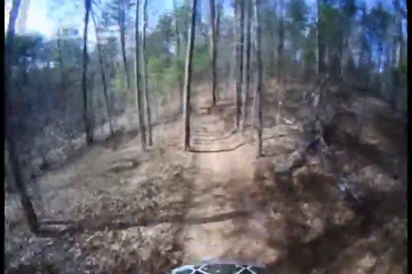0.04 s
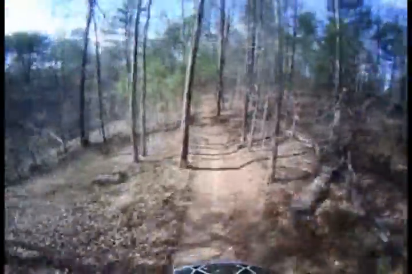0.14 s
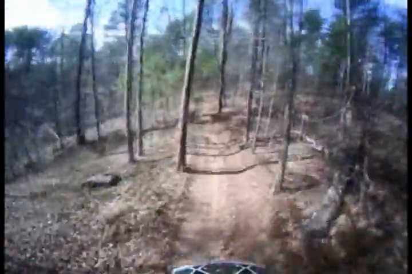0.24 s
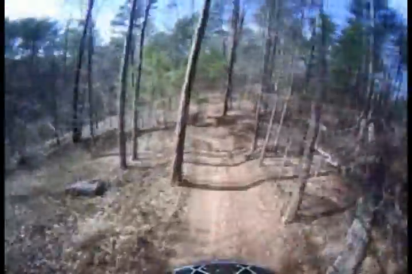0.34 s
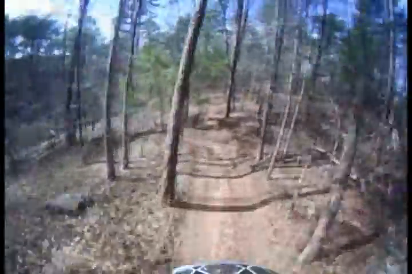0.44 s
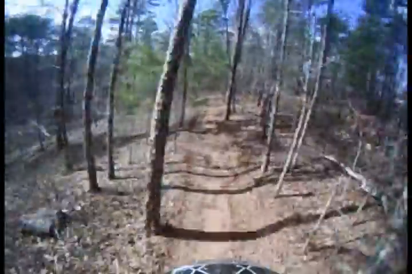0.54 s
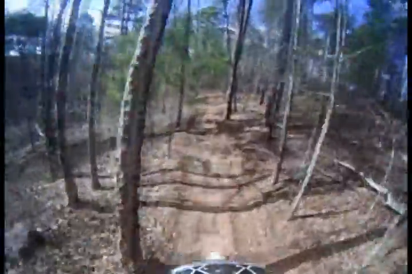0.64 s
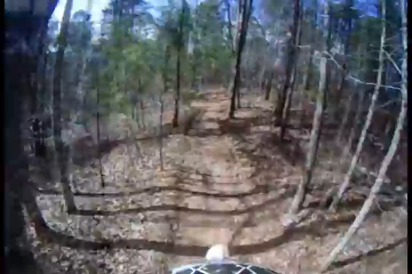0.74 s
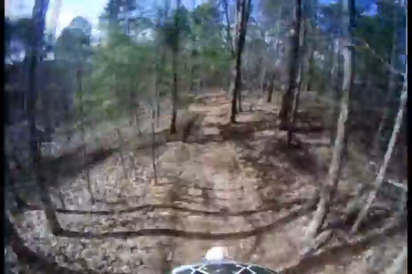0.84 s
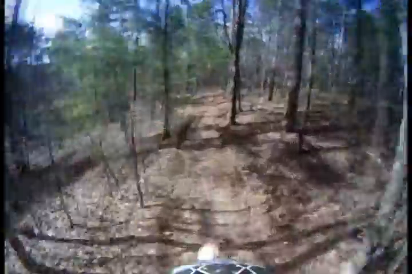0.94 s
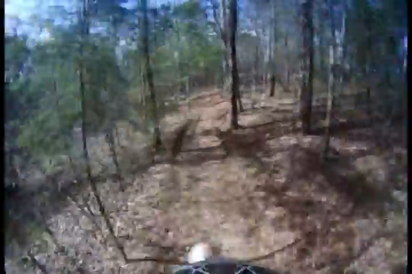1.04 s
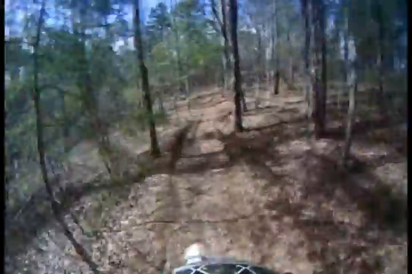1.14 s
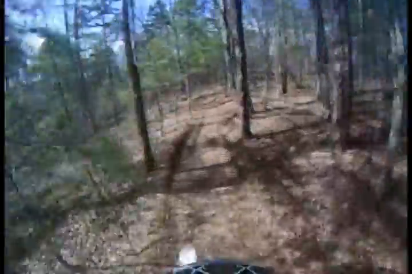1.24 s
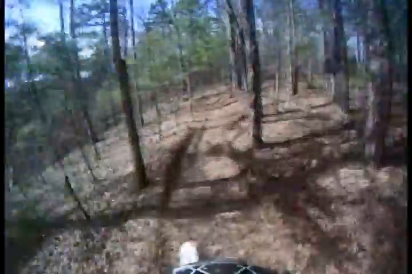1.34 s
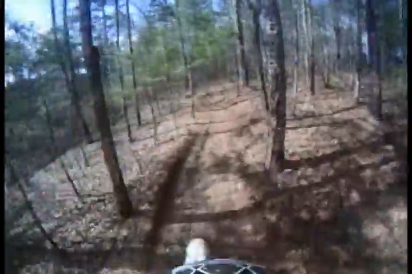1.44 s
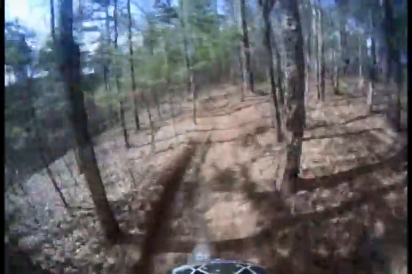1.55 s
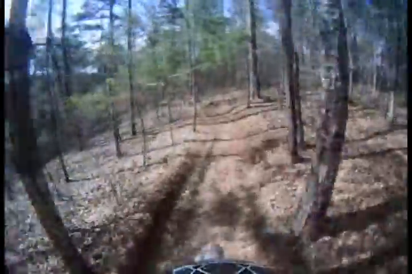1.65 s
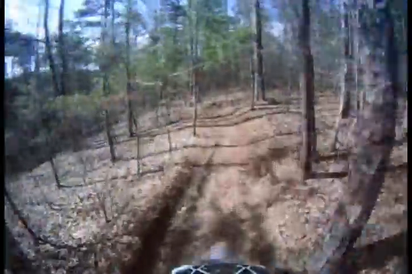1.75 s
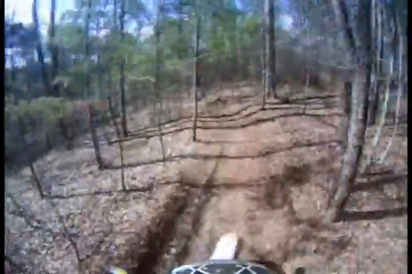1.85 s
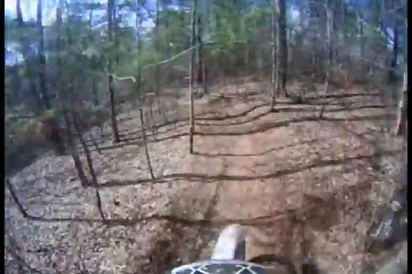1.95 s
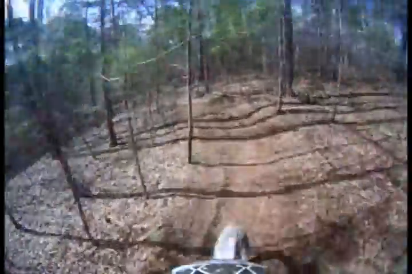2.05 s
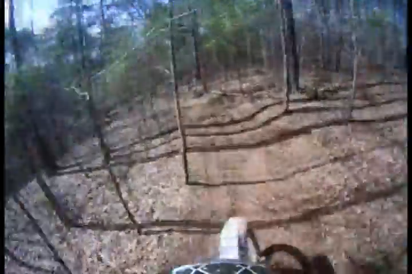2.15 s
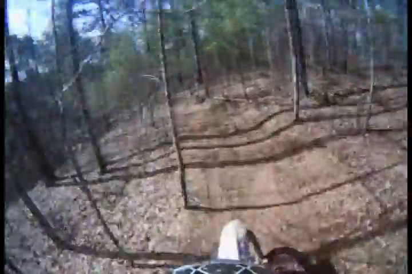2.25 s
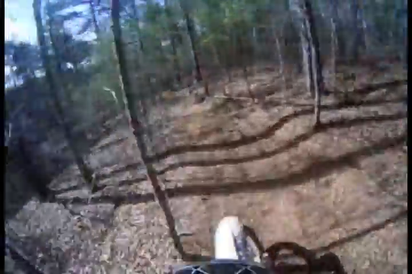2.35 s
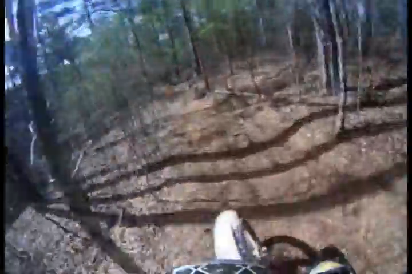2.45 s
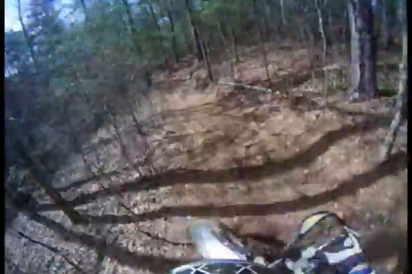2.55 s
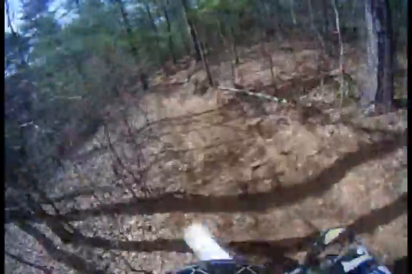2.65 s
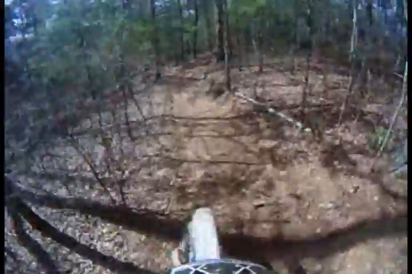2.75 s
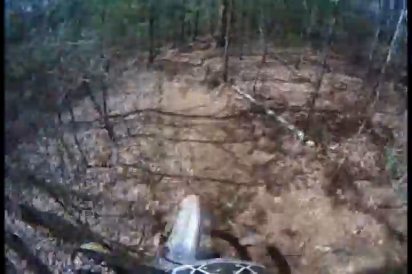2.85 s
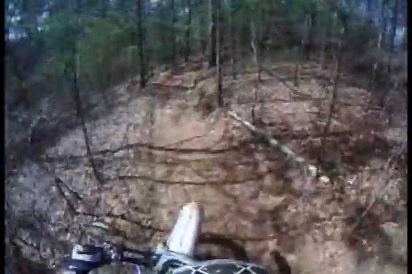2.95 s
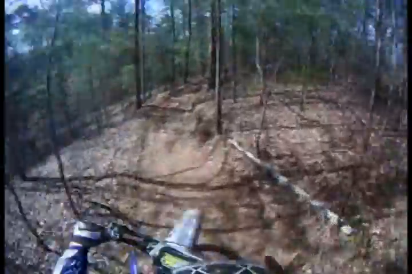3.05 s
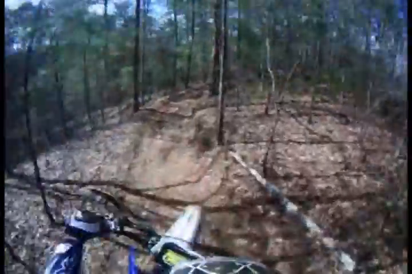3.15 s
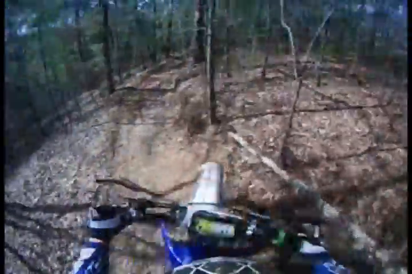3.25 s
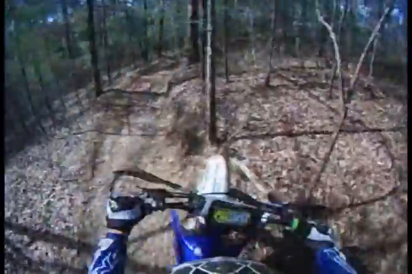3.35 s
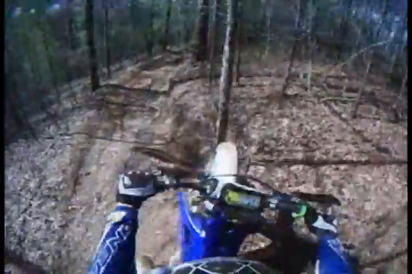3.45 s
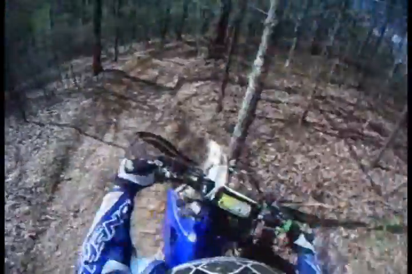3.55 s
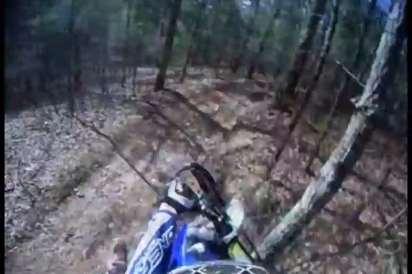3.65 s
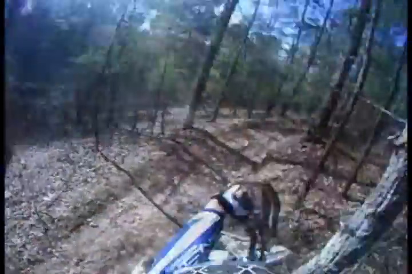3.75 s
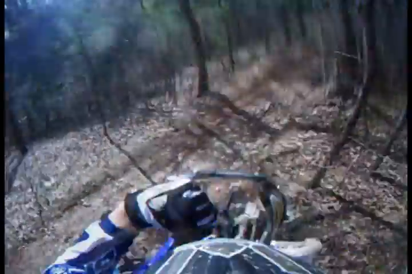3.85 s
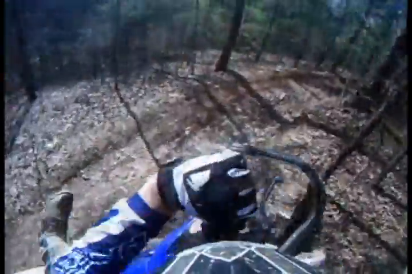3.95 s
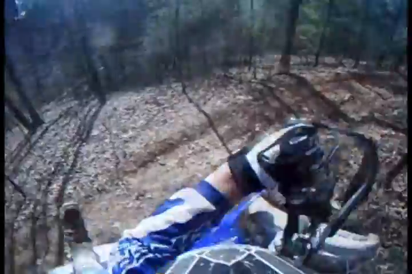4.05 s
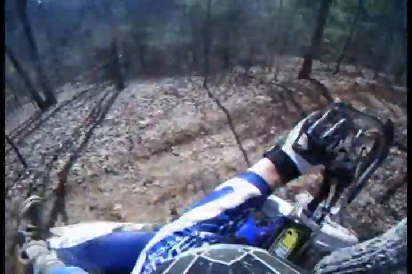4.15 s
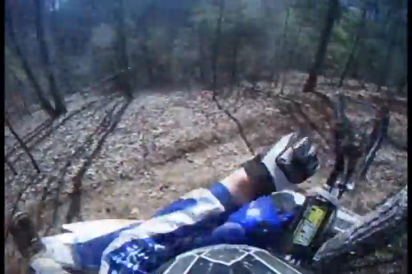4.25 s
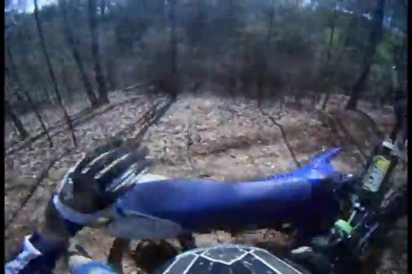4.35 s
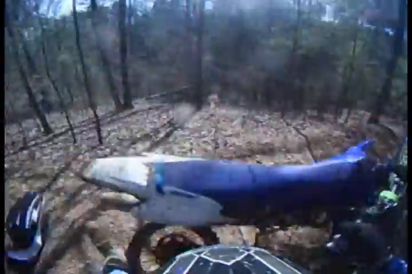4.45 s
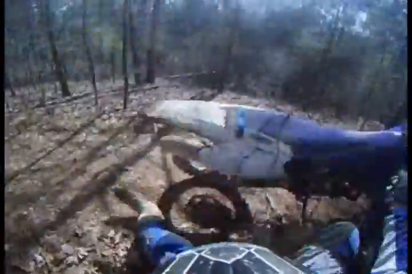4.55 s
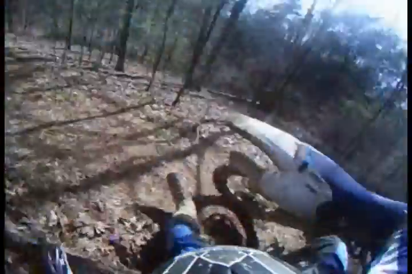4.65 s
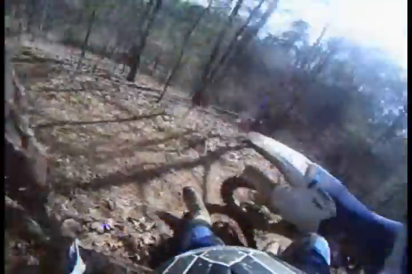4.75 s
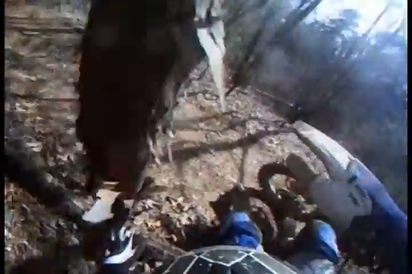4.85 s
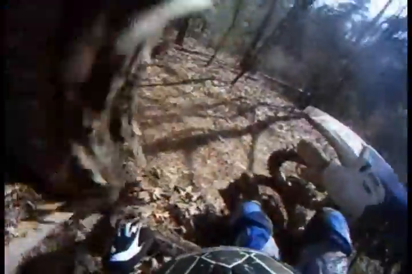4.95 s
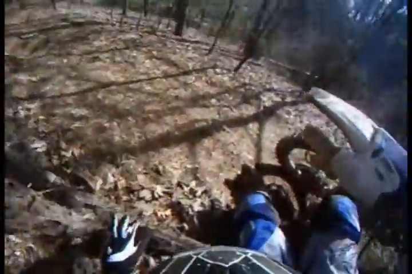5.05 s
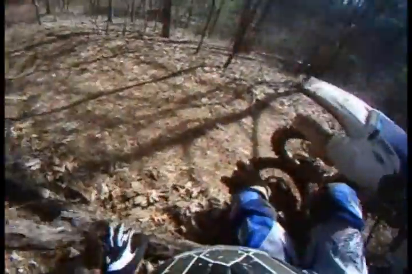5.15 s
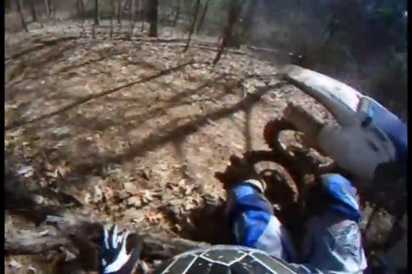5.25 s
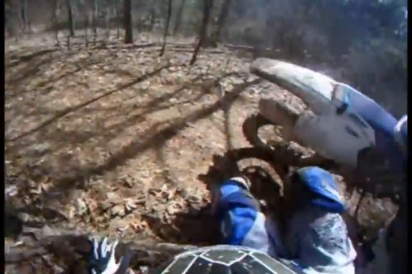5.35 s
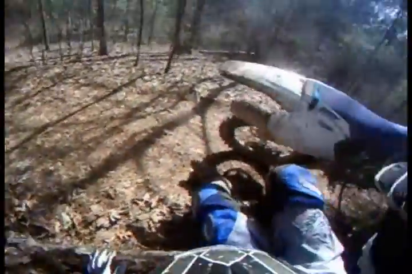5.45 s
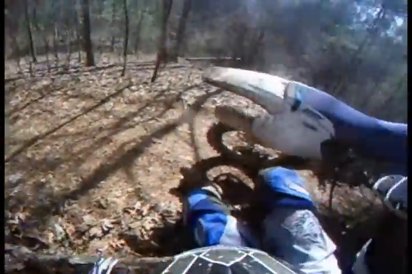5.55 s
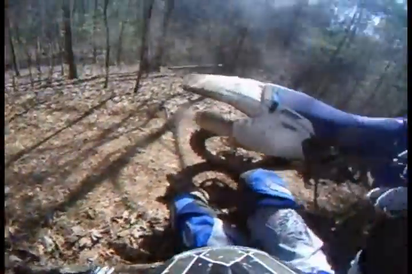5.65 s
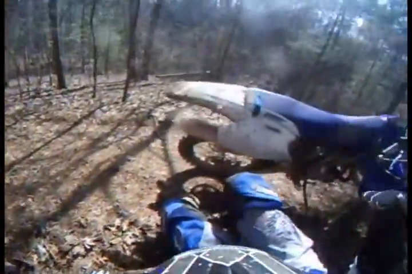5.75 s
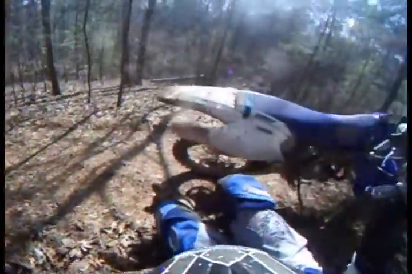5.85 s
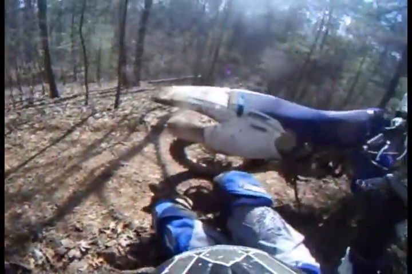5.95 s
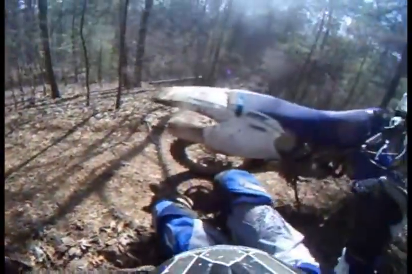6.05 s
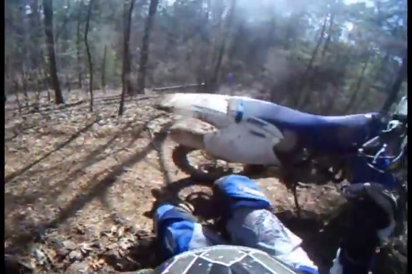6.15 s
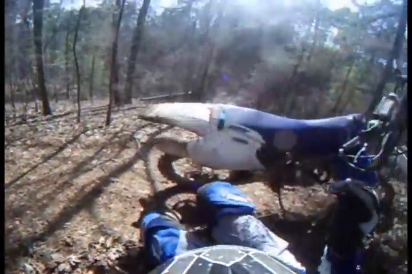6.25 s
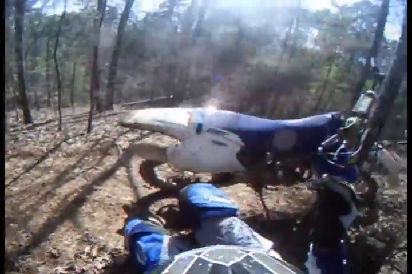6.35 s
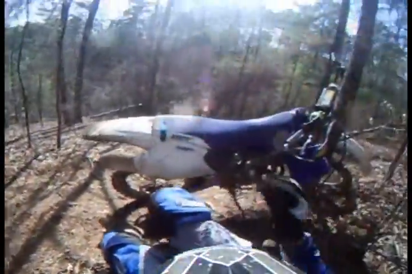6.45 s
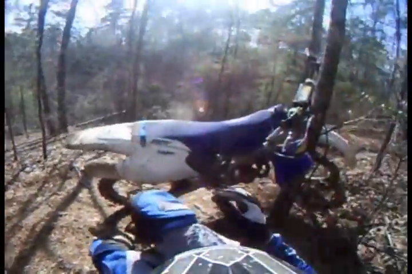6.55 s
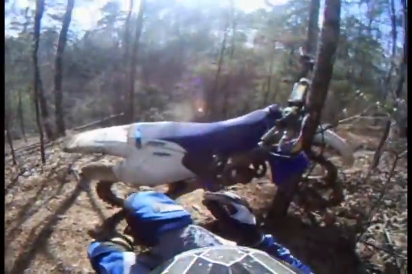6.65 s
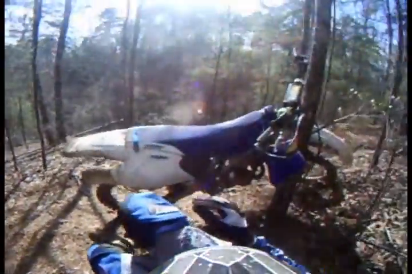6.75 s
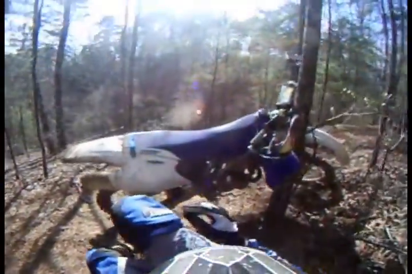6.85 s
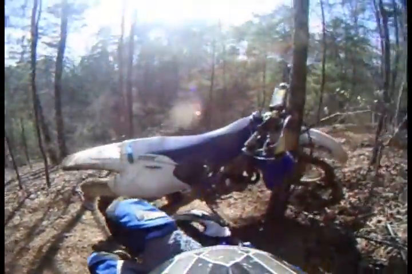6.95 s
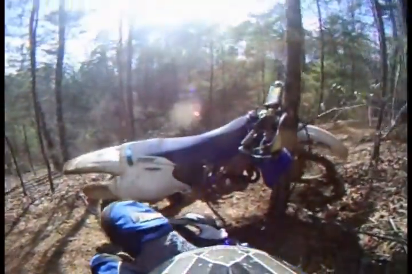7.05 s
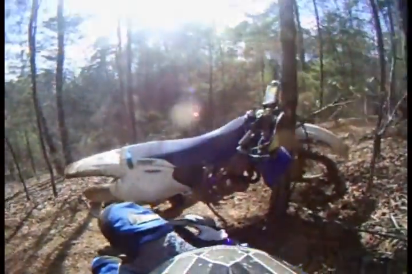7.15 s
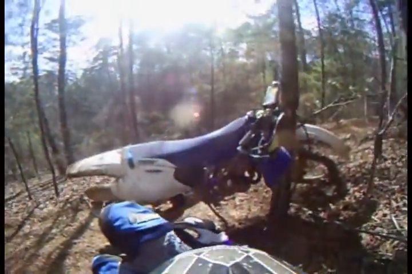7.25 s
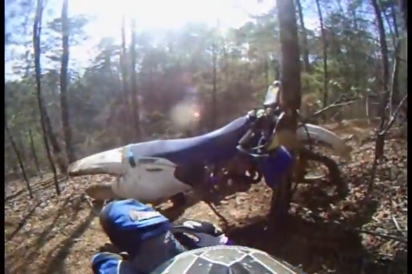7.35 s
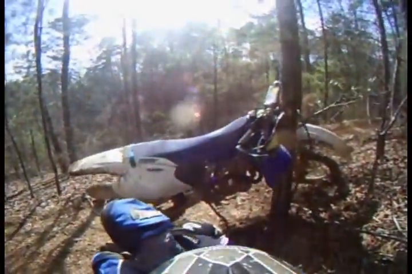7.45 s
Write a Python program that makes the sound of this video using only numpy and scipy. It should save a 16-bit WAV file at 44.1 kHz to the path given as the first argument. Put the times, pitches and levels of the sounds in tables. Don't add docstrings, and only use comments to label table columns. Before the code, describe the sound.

A single-cylinder four-stroke bike revs, coasts with sputtering strokes and revs again outdoors in woods, heard through a dull helmet camera casing. After a last loud burst it hits a tree: clipped, crackling blows, rattles, scrapes and dull thuds come in clusters. Then only a slow, quiet idle thump, low rumble and a few small ticks remain.

```python
import sys
import numpy as np
from scipy import signal
from scipy.fft import rfft, irfft
from scipy.io import wavfile
from scipy.ndimage import uniform_filter1d

SR = 44100
rng = np.random.default_rng(int(sys.argv[2]) if len(sys.argv) > 2 else 0)


def inscribe(sig):
    pcm = np.round(np.clip(np.atleast_2d(sig).T, -1, 1) * 32767)
    wavfile.write(sys.argv[1], SR, pcm.astype(np.int16))


def decibels_to_gain(level_db):
    exponent = np.asarray(level_db, float) / 20
    return 10 ** exponent


N = 331178
RAIL = 1.15
COUPLING_S = .0019
SHUT_DB, OPEN_DB = -37, -30


def in_time(rows):
    s, *columns = np.transpose(rows)
    return [np.interp(np.arange(N) / SR, s, c) for c in columns]


def rms_one(x):
    return x / np.sqrt(np.mean(x ** 2) + 1e-20)


def drift(rate_hz):
    r = np.exp(-2 * np.pi * rate_hz / SR)
    return rms_one(signal.lfilter([1], [1, -2 * r, r * r], rng.standard_normal(N + SR))[SR:])


def resonate(x, modes):
    out = 0
    for k, (hz, width_hz, db) in enumerate(modes):
        r = np.exp(-np.pi * width_hz / SR)
        a = [1, -2 * r * np.cos(2 * np.pi * hz / SR), r * r]
        mode = signal.lfilter([(1 - r * r) / 2, 0, (r * r - 1) / 2], a, x + 1e-18)
        out = out + (-1) ** k * decibels_to_gain(db) * mode
    return out


def low_pass(x, hz, order=2):
    return signal.sosfilt(signal.butter(order, hz, fs=SR, output="sos"), x)


def strokes(turns, jitter, spread_db):
    whole = np.floor(turns + jitter * drift(57))
    at = np.flatnonzero(np.diff(np.maximum.accumulate(whole)) > 0)
    clicks = np.zeros(N)
    clicks[at] = decibels_to_gain(spread_db * rng.standard_normal(N)[:len(at)])
    return clicks


# (t/s, f/Hz)
CRANK_SPEED = [(0, 90), (.26, 85), (.44, 106), (.5, 97.5), (.715, 99.5), (.745, 78), (.78, 93), (.92, 86),
               (1.04, 91.5), (1.3, 91.5), (1.6, 84.5), (1.87, 85), (2.17, 76.5), (2.5, 75), (2.7, 72),
               (2.79, 62), (2.86, 80), (3.0, 97),
               (3.13, 104.5), (3.26, 82), (3.3, 69.5), (3.5, 35), (3.61, 32), (3.62, 74), (3.73, 74),
                 (3.8, 50), (5.4, 30)]
# (t/s, level/dB)
THROTTLE_BARK = [(0, -34), (.275, -38), (.285, -28.5), (.72, -26.5), (.74, -34.5), (2.44, -40.5),
                 (2.45, -35.5), (2.71, -28), (2.72, -35.5), (2.835, -40), (2.84, -18), (3.12, -20.5),
                 (3.22, -32.5), (3.605, -38), (3.612, -34.5), (3.72, -24), (3.76, -31), (5.4, -76.5)]
# (t/s, bark level/dB)
CAUGHT_STROKES = [(.08, -33), (0.784, -31.5), (1.229, -33.5), (1.588, -39.5), (1.706, -35.5),
                  (1.754, -31.5), (1.894, -34), (1.942, -34), (1.969, -33), (2.04, -34.5), (2.114, -35.5),
                  (2.273, -35), (2.299, -34), (2.327, -34), (2.404, -31.5), (2.819, -31.5), (3.504, -37.5),
                  (3.563, -37)]


def engine():
    t = np.arange(N) / SR
    crank_hz, = in_time(CRANK_SPEED)
    throttle_db, = in_time(THROTTLE_BARK)
    turns = 1 + np.cumsum(crank_hz) / SR
    bark_db = throttle_db
    for s, db in CAUGHT_STROKES:
        bark_db = np.where(np.abs(t - s) < .012, db, bark_db)
    bark_db = uniform_filter1d(bark_db, size=100)
    bark = exhaust_bark(turns, crank_hz, bark_db)
    fallen_db = -291 * (t - 3.27).clip(0, .2)
    wander = .15 * drift(8)
    tones = crank_hum(turns, wander, fallen_db)
    tones = tones + airbox_boom(turns, wander, crank_hz, throttle_db, fallen_db)
    return decibels_to_gain(bark_db) * bark + np.sqrt(2) * tones + gear_hiss(turns, throttle_db)


# (f/Hz, width/Hz, level/dB)
EXHAUST_MODES = [(235, 154, 21.5), (408.2, 450, 10.5), (610, 180, -7), (760, 36, 5), (940, 150, -3),
                 (1470, 200, 5), (1970, 250, -33.5), (2270, 350, -5.5), (2820, 310, -24.5)]


def exhaust_bark(turns, crank_hz, bark_db):
    fired = strokes(turns / 2, jitter=.002, spread_db=.8)
    fired = fired + .9 * np.roll(fired, round(.0036 * SR))
    blast = signal.lfilter([1], [1, -np.exp(-1 / (.004 * SR))], fired)
    blast = np.diff(blast * rng.standard_normal(N), prepend=0)
    bark = rms_one(resonate(fired + .09 * blast, EXHAUST_MODES))
    bark = signal.sosfilt(signal.butter(2, 150, "high", fs=SR, output="sos"), bark)
    header = resonate(fired, [(546.5, 110, 0)])
    header = rms_one(resonate(header, [(546.5, 220, 0)]))
    bark = bark + decibels_to_gain(-8 + .5 * (86 - crank_hz.clip(70))) * header
    bark /= np.sqrt(uniform_filter1d(bark ** 2, size=6000) + .01)
    flow = resonate(rng.standard_normal(N), EXHAUST_MODES[:3])
    flow = rms_one(resonate(flow, EXHAUST_MODES[:3]))
    loose = np.interp(bark_db, [SHUT_DB, OPEN_DB], [.62, .06])
    return np.sqrt(1 - loose) * bark + np.sqrt(loose) * flow


def crank_hum(turns, wander, fallen_db):
    hum = np.sin(2 * np.pi * turns + wander) + 0.22 * np.sin(3 * np.pi * turns + wander)
    return decibels_to_gain(-34.5 + fallen_db + drift(10)) * hum


def airbox_boom(turns, wander, crank_hz, throttle_db, fallen_db):
    t = np.arange(N) / SR
    orders = np.arange(3, 7)[:, None]
    airbox_hz, width_hz = 182.5, 15.1
    share = 1 / (1 + ((orders * crank_hz / 2 - airbox_hz) / width_hz) ** 2)
    boom = np.sum(share * np.sin(orders * (np.pi * turns + wander)), axis=0)
    gulp_db = sum(7 * np.exp(-((t - s) / .04 - 1) ** 2) for s in (0.778, 3.2))
    boom_db = -26.5 + gulp_db + fallen_db
    boom_db += 0.48 * (crank_hz - 90)
    boom_db -= .5 * (throttle_db - SHUT_DB).clip(0)
    return decibels_to_gain(boom_db + 1.2 * drift(25)) * boom


# (f/Hz, width/Hz, level/dB)
SHELL_MODES = [(500, 334, -1.5), (975, 1100, -6), (1479, 110, 1.5), (1917, 110, -9.5), (2430, 210, -1),
               (3102, 337, -7.5), (4986, 420, -9), (5770, 300, -8.5)]


def gear_hiss(turns, throttle_db):
    hiss_db = -39 + 0.46 * (throttle_db - SHUT_DB)
    beat = 1 + 0.13 * np.cos(np.pi * turns)
    hiss = rms_one(resonate(rng.standard_normal(N), SHELL_MODES))
    return decibels_to_gain(hiss_db + 1.1 * drift(37)) * beat * hiss


SLOW_MS = 5
WOBBLE_HZ, WOBBLE_S, WOBBLE_HEIGHT = 33.5, .085, .55


def blows():
    thrown = swings()
    knots = [(0, 0), (thrown[0][0] - .03, 0)]   # (s, travel in rails)
    rocking = np.zeros(N)
    following = [s for s, ms, force in thrown[1:]] + [N / SR]
    t = np.arange(SR // 4) / SR
    wobble = np.sin(2 * np.pi * WOBBLE_HZ * t) * np.exp(-t / WOBBLE_S)
    for (s, ms, force), after in zip(thrown, following):
        side, end = np.sign(force), s + ms / 1000
        from_rest = knots[-1][1] == 0 and ms >= SLOW_MS
        knots += [(s, -force if from_rest else -side), (end, side)]
        if after - end > .06:
            knots += [(end + .004, force), (end + .009, side), (end + .02, 0), (after - .03, 0)]
            rest = round((end + .012) * SR)
            rocking[rest:rest + len(t)] -= side * wobble
        else:
            knots += [((end + after) / 2, force)]
    return RAIL * (in_time(knots)[0] + WOBBLE_HEIGHT * rocking)


# (t/s, crossing/ms)
TREE_SWINGS = [(3.289, 2.4), (3.3006, 3.5), (3.3048, 3.1), (3.3169, 3.5), (3.3346, 3.9), (3.3416, 3),
               (3.36, 2.2), (3.3838, 2.4), (3.3922, 4.1), (3.4021, 3.5), (3.4185, 14), (3.4372, 3.5),
               (3.4532, 3.5)]
THROWN_SWINGS = [(3.7323, 6.1), (3.75, 3.9), (3.7638, 3.9), (3.7775, 4.8), (3.7903, 1.8), (3.8058, 2.4),
                 (3.8178, 5.7), (3.8305, 5), (3.8592, 3.9), (3.8688, 3.8), (3.8846, 3.5), (3.933, 2.2)]
TRUNK_SWINGS = [(3.966, 1), (3.976, 1.3), (3.9785, 3), (3.9815, 5), (3.9907, 5.7), (4.0047, 4.9),
                (4.0124, .5), (4.0166, .5), (4.0227, .7), (4.0247, .3), (4.0282, .3), (4.0296, .3),
                (4.0356, .3), (4.0584, .5), (4.0828, .5), (4.1004, 2), (4.1191, 1.7), (4.1238, 1.5),
                (4.1305, 2.8), (4.1392, 1.9), (4.1672, 2.6), (4.1881, 2.8), (4.1929, 3.1), (4.2188, 2.4),
                (4.2276, 2.5), (4.239, 3), (4.2568, 4.7), (4.2707, 2.7), (4.2828, 4.5), (4.2961, 3.9)]
GROUND_SWINGS = [(4.6555, .8), (4.6598, 1.9), (4.6711, 2.3), (4.6839, 1.9), (4.6942, 3.9), (4.7123, 2.3),
                 (4.724, 3.4), (4.7357, 4.2)]
REBOUND_SWINGS = [(4.8239, .3)]
ROLL_SWINGS = [(5.1152, 3.7), (5.1194, .3), (5.1337, 3.3), (5.1591, 2.2), (5.1711, 6.1), (5.1835, 5),
               (5.1981, 2.8), (5.2086, 4.8), (5.23, 2.6), (5.238, 5), (5.2479, 3.9), (5.2683, 5.6),
               (5.2791, 6.1), (5.2915, 5)]


def swings():
    outward = [TREE_SWINGS, THROWN_SWINGS, TRUNK_SWINGS, GROUND_SWINGS]
    blow_list = [(blow, 1) for blow in outward] + [(REBOUND_SWINGS, -.1), (ROLL_SWINGS, 1)]
    rows = []
    for blow, first in blow_list:
        for k, (s, ms) in enumerate(blow):
            press = .5 if ms >= SLOW_MS else 5
            rows.append((s, ms, first * (-1) ** k * press))
    return rows


# (t/s, peak level/dB, loudest f/Hz, length/ms)
LOOSE_RATTLES = [(3.3124, -27, 3385, 1.8), (4.4259, -19.5, 3060, 12), (4.4538, -28.5, 3160, 7.8),
                 (4.4938, -21.5, 2850, 9.1), (4.5485, -25, 2930, 19), (4.57, -30, 2960, 9.4),
                 (4.5855, -26, 3020, 23), (4.6438, -23.5, 3130, 6.6), (4.774, -16, 2940, 12)]
# (t/s, peak level/dB, loudest f/Hz, length/ms)
SHELL_SCRAPES = [(2.6902, -18.5, 1296, 9.5), (3.1735, -19.5, 1514, 7.4), (3.2825, -15, 1497, 29),
                 (3.4248, -20.5, 2390, 6.3), (3.4306, -1, 2426, 8), (3.6919, -12, 2150, 5.2),
                 (3.7852, -28, 1940, 35), (3.8302, -2, 2420, 5), (3.8697, -2, 1714, 12),
                 (3.9932, 0, 1905, 8.7), (4.0047, -1, 1490, 52), (4.1934, -18.5, 2750, 12),
                 (4.2508, -6.5, 1422, 4.4), (4.2985, -19, 2026, 8.1), (4.3965, -14.5, 2580, 7.9),
                 (4.4766, -18, 1470, 4.4), (4.6957, -19.5, 2897, 2.8), (4.935, -32, 1920, 16),
                 (5.1331, -1, 1674, 16), (5.1806, -15.5, 1960, 12), (5.208, -5.5, 2850, 6.2),
                 (5.2488, -20.5, 2624, 5.1), (5.2829, -5, 2550, 14),
                 (2.6737, -13.5, 1420, 13), (3.4985, -45, 1424, 44), (3.7, -19, 1100, 14),
              (3.714, -18, 710, 20), (3.838, -16.5, 2000, 18), (3.9904, -1, 1970, 25),
              (4.1902, -7.5, 2630, 14), (4.2399, -10.5, 1460, 30), (4.794, 1, 2523, 8.3),
              (4.8125, -13.5, 1293, 25), (5.095, -15, 2970, 110), (5.1699, 8, 1808, 7.8),
              (5.2398, -7.5, 1676, 67), (5.2727, -8, 1440, 13), (5.2915, 1, 2685, 16),
              (5.3084, -15.5, 3140, 26), (5.335, -30.5, 2440, 5.7), (5.3715, -37.5, 2330, 15)]
# (t/s, peak level/dB, loudest f/Hz, length/ms)
FALLEN_TICKS = [(6.585, -34, 1530, 17), (5.4748, -37, 1870, 5.7), (5.9013, -40.5, 3230, 8.6),
                (5.973, -16.5, 2610, 11), (6.5724, -22, 2400, 10.6), (7.3467, -40, 2290, 19),
                (7.4323, -42.5, 1516, 17), (7.4748, -31.5, 1470, 29)]


def clatter():
    out, t = np.zeros(N + SR), np.arange(SR // 10) / SR
    touches = LOOSE_RATTLES + SHELL_SCRAPES + FALLEN_TICKS
    for k, (s, db, hz, ms) in enumerate(touches):
        own_db = 14 if k < len(LOOSE_RATTLES) else 5
        burst = rng.standard_normal(len(t)) * np.exp(-(t / (ms * 0.00076)) ** 2)
        part = [(hz, 300, own_db), (1.8 * hz, 300, own_db - 8)]
        ring = resonate(burst, SHELL_MODES[1:] + part)
        out[round(s * SR):][:len(t)] += decibels_to_gain(db) * ring / np.abs(ring).max()
    return out[:N]


# (t/s, peak level/dB, f/Hz, t60/ms)
DULL_BUMPS = [(2.718, -5, 192, 35), (2.781, -20, 290, 48), (3.664, 4, 145, 30), (2.744, -16, 294, 76),
              (2.804, -12, 300, 44), (4.425, -6, 163, 60), (4.477, -5, 197, 87), (4.52, -41.5, 975, 530),
              (4.649, -5, 117, 81), (4.804, 2.5, 168.4, 25), (4.816, -2, 137.7, 82), (4.833, 4.5, 149, 58),
              (5.187, -9.5, 127.8, 28), (6.248, -27.5, 205, 99), (6.936, -19, 100, 19),
              (7.126, -23, 103, 33), (7.476, -25.5, 209, 160)]


def bumps():
    out, t = np.zeros(N + SR), np.arange(SR // 10) / SR
    for s, db, hz, ms in DULL_BUMPS:
        fading = decibels_to_gain(db - 60 * t / (ms / 1000)) * np.minimum(t / .004, 1)
        out[round(s * SR):][:len(t)] += fading * np.sin(2 * np.pi * hz * t)
    return out[:N]


def tick_over():
    t = np.arange(N) / SR
    turns = 26.36 * (t - 5.576)
    settled = ((t - 4.9) / 0.98).clip(0, 1)
    push = strokes(turns, jitter=.025, spread_db=3.3)
    push = push * decibels_to_gain(1.5 * np.cos(np.pi * turns))
    u = np.arange(-400, 400) / (0.0021 * SR)
    shape = (.6 * u ** 2 - 1) * np.exp(-u ** 2 / 2)
    thump = rms_one(np.convolve(push, shape, "same"))
    puff = signal.lfilter([1], [1, -np.exp(-1 / (.007 * SR))], push) * rng.standard_normal(N)
    puff = resonate(puff, [(170, 145, 3), (376, 410, -16), (800, 700, -29)])
    puff = rms_one(low_pass(puff, 500))
    return decibels_to_gain(-41) * settled * (thump + 0.51 * puff)


# (f/Hz, level/dB per Hz)
RUMBLE_COLOUR = [(8.8, -46), (15, 6), (44, -8.5), (105, -7.5), (129, -30), (200, -16.5), (238, -36),
                 (439, -40), (700, -52), (910, -49), (1540, -120)]
# (t/s, rumble level/dB)
HELMET_JOLTS = [(0.051, -28.5), (.5, -36), (2.891, -18.5), (3.08, -22), (3.302, -19.5), (3.501, -19.5),
                (3.65, -21), (4.248, -13.5), (4.4, -17), (4.48, -11), (4.841, -17), (5.1, -25.5),
                (5.299, -13.5), (6.58, -30.5), (7.17, -34)]


def shaking():
    t = np.arange(N) / SR
    riding_db, lying_db = -32.5, -38.5
    moving = t < 5.45
    rumble_db = np.where(moving, riding_db, lying_db)
    for s, db in HELMET_JOLTS:
        away_db = np.maximum(111.5 * (s - t), 113 * (t - s))
        rumble_db = np.maximum(rumble_db, db - away_db)
    hz = np.fft.rfftfreq(N, 1 / SR) + 1
    colour_hz, colour_db = np.transpose(RUMBLE_COLOUR)
    colour = decibels_to_gain(np.interp(np.log(hz), np.log(colour_hz), colour_db))
    rumble = rms_one(irfft(rfft(rng.standard_normal(N)) * colour, N))
    rumble = np.where(moving, rumble, low_pass(rumble, 210))
    grain_level = decibels_to_gain(1.2 * rng.exponential(1, N).clip(0, 4))
    grains = (rng.random(N) < 1500 / SR) * grain_level * rng.choice([-1, 1], N)
    grit = rms_one(resonate(grains, SHELL_MODES))
    grit_db = -61.5 + rumble_db - riding_db
    return decibels_to_gain(rumble_db + 2.2 * drift(15)) * rumble, decibels_to_gain(grit_db) * moving * grit


def scene():
    rumble, grit = shaking()
    travel = blows()
    free = 1 - uniform_filter1d(1. * (np.abs(travel) > .9 * RAIL), size=900)
    heard = engine() + tick_over() + clatter() + bumps() + grit + free * rumble
    heard = low_pass(heard, 5800, order=8)
    bass_ahead = signal.lfilter([1, -np.exp(-1 / (COUPLING_S * SR))], [1, -.9985], heard)
    return (travel + bass_ahead)[None]


def top_cut(x):
    return signal.sosfilt(signal.butter(12, 6090, fs=SR, output="sos"), x)


def record(dry):
    railed = np.clip(dry, -RAIL, RAIL)
    coupled = signal.lfilter([1, -1], [1, -np.exp(-1 / (COUPLING_S * SR))], railed)
    kept = coupled * (np.abs(coupled) < 1.03)
    dulled = low_pass(low_pass(kept, 3564, order=3), 3410)
    floor = decibels_to_gain(-69) * low_pass(rng.standard_normal(dry.shape), 4100, order=4)
    limited = low_pass(np.clip(dulled, -1, 1) + floor, 12700, order=10)
    return top_cut(limited)


dry = scene()
out = record(dry)
inscribe(out)
```